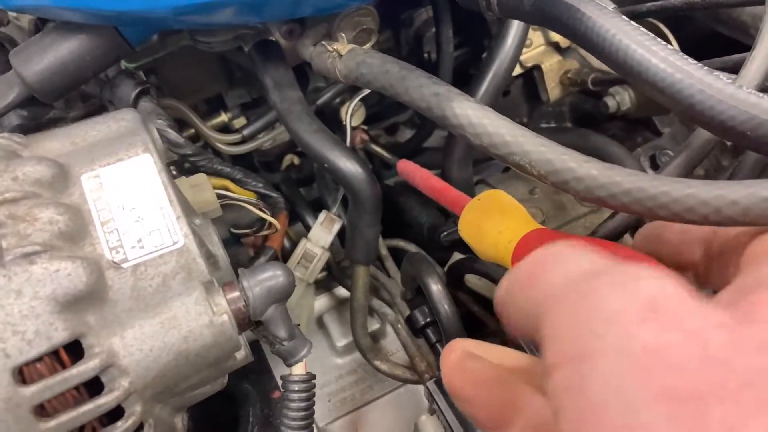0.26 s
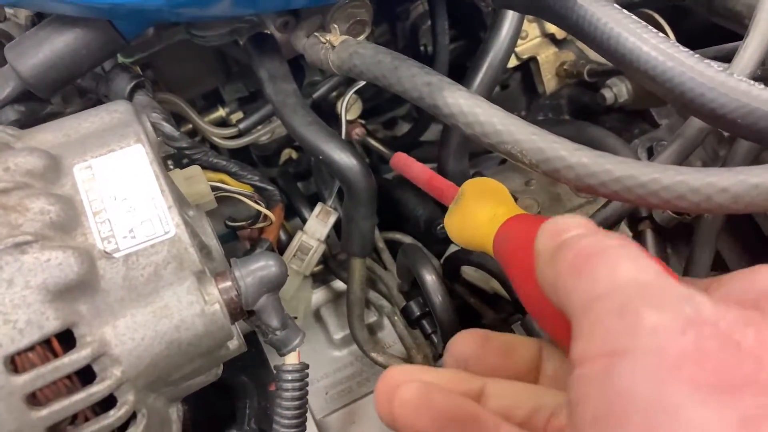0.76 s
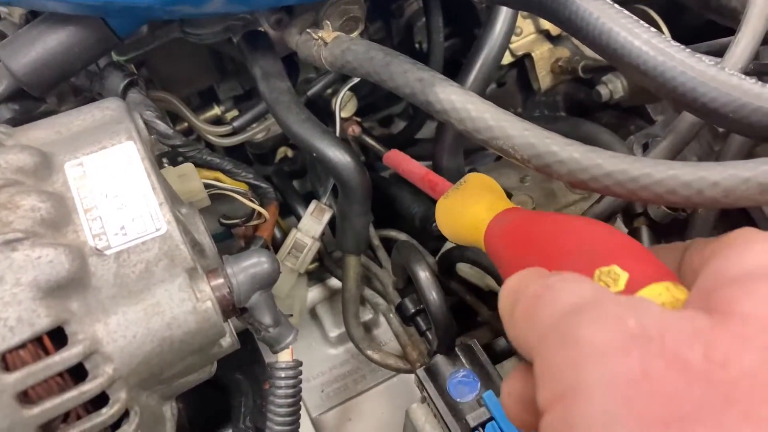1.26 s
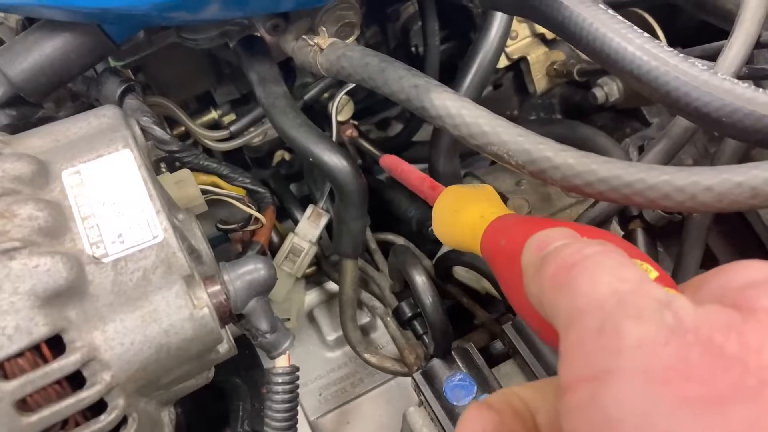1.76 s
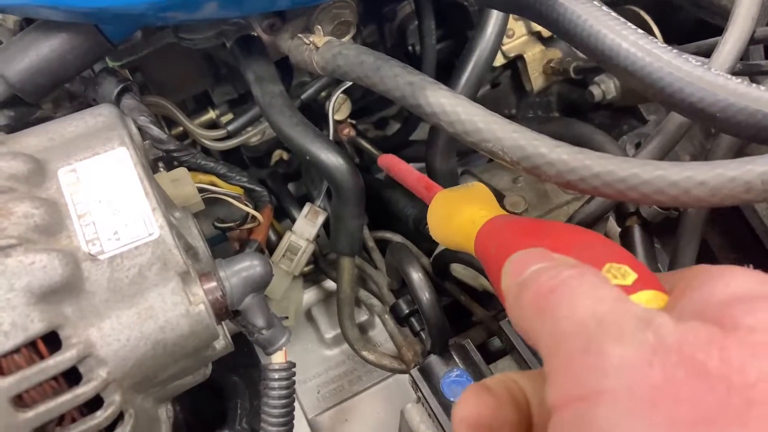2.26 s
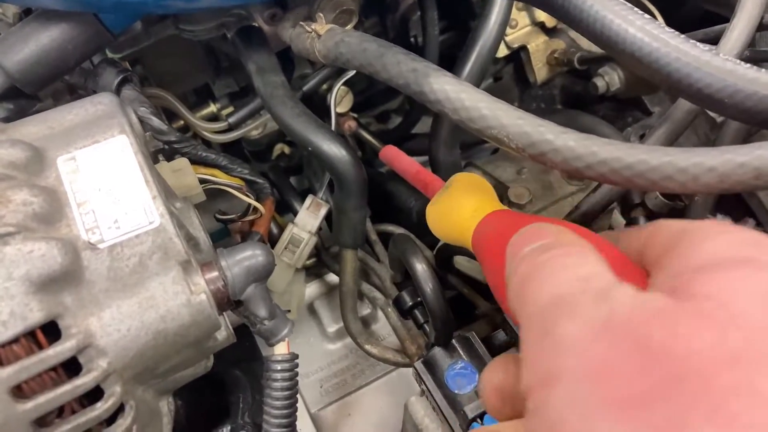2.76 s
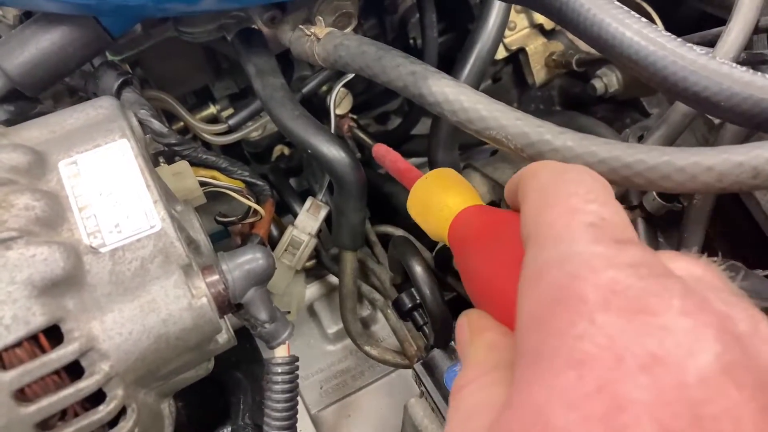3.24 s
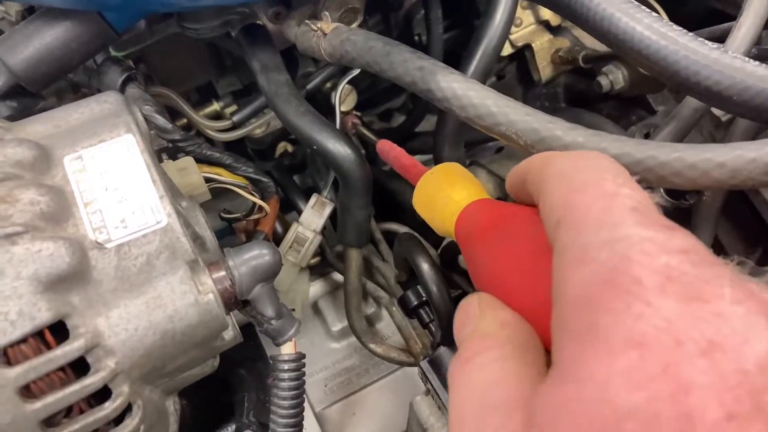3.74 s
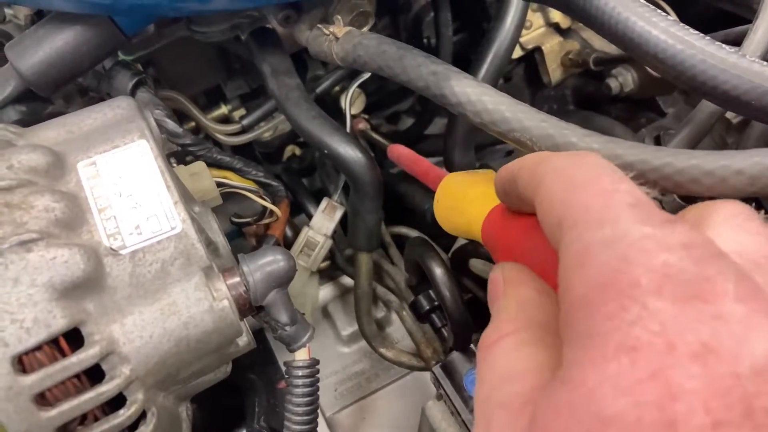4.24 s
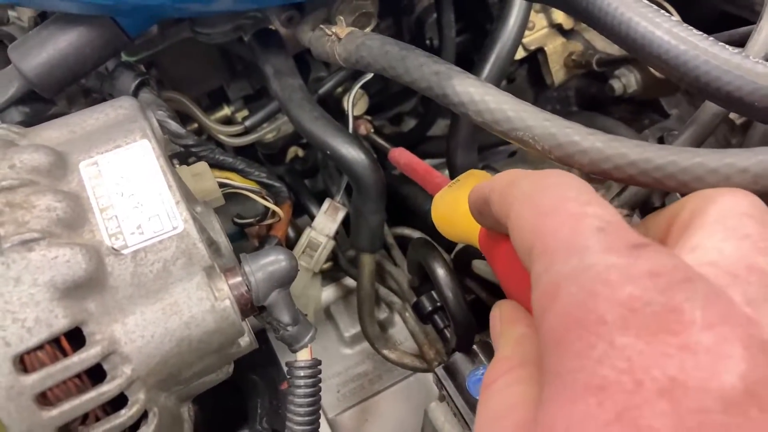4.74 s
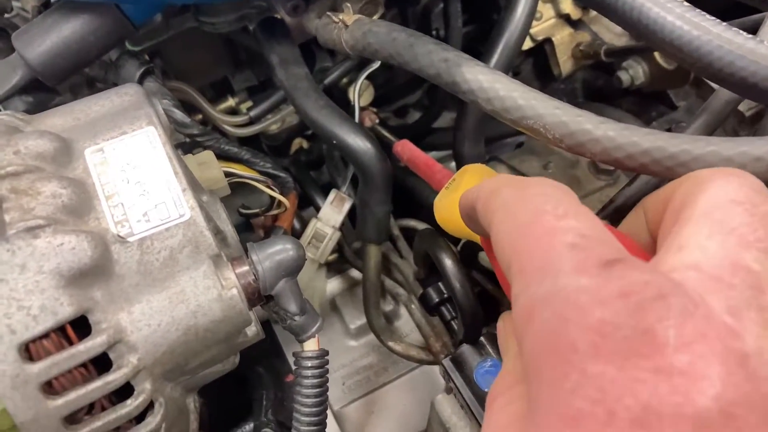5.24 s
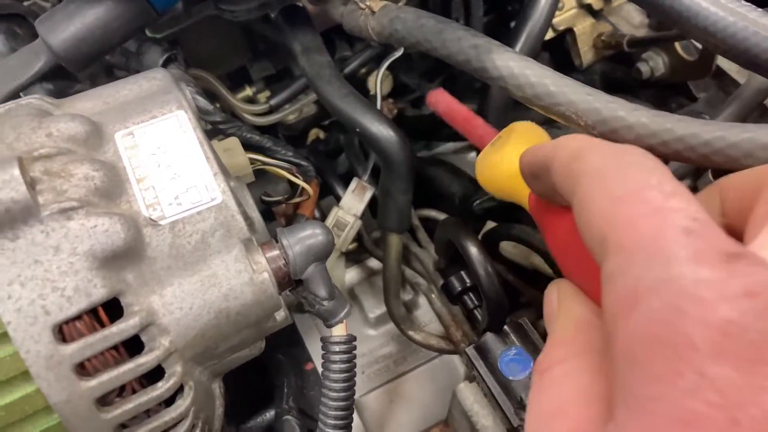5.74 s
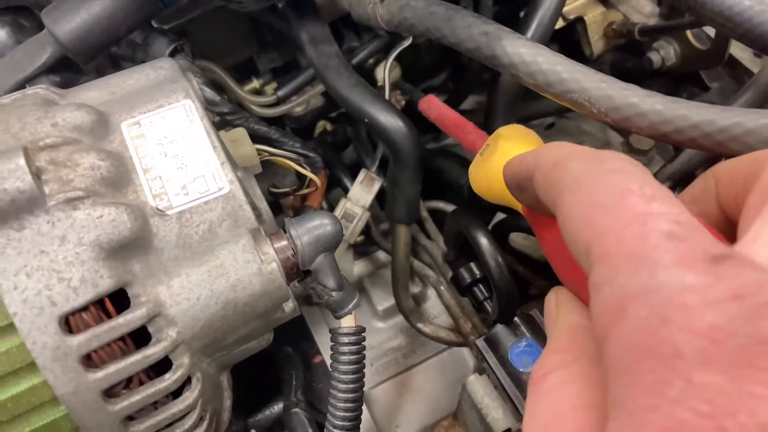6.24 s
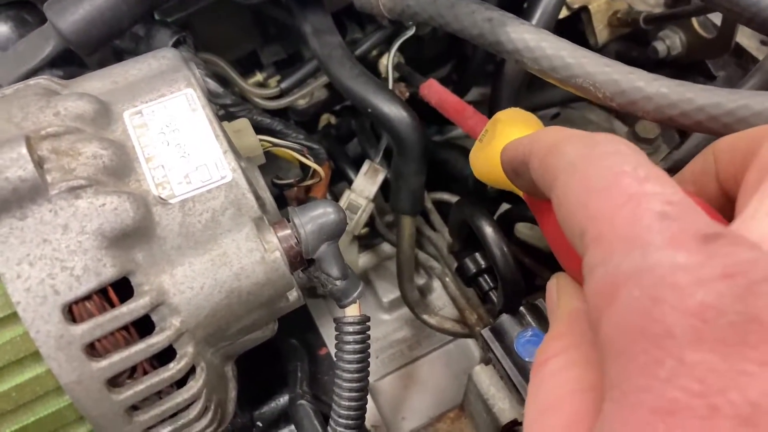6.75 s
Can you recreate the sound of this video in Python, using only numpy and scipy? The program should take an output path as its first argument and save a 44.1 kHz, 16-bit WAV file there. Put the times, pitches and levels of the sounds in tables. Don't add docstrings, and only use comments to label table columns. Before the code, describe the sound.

In an open engine bay, rapid deep exhaust pulses throb in clusters with airy hiss bursts, while belts, fan and pumps whirr continuously behind.

```python
import sys
import numpy as np
from scipy import signal
from scipy.io import wavfile
from scipy.ndimage import uniform_filter1d

SR = 44100
rng = np.random.default_rng(int(sys.argv[2]) if len(sys.argv) > 2 else 0)


def master(y):
    cut = np.clip(np.atleast_2d(y).T, -1, 1)
    pcm = np.round(cut * 32767)
    wavfile.write(sys.argv[1], SR, pcm.astype(np.int16))


def gain_from_db(level_db):
    decades = np.asarray(level_db, float) / 20
    return 10 ** decades


N = 308700


def evened(x):
    return x / np.sqrt(np.mean(x ** 2) + 1e-20)


def read(hz, at_hz, value):
    return np.interp(np.log(hz + 1), np.log(np.add(at_hz, 1)), value)


def noise_pair(level_db, same, lead, balance_db, patchy_db, size):
    a, b, c, d, patches = rng.standard_normal((4 * N // size + 5, size // 2 + 1, 5)).T
    patches = uniform_filter1d(patches, size=6, axis=0)
    patches = evened(uniform_filter1d(patches, size=6, axis=1))
    same = np.clip(same, 0, 1)[:, None]
    left = a + 1j * b
    right = same * left + np.sqrt(1 - same ** 2) * (c + 1j * d)
    right = right * (np.exp(-1j * lead) / gain_from_db(balance_db))[:, None]
    z = np.array([left, right]) * gain_from_db(level_db[:, None] + patchy_db * patches)
    return signal.istft(z, nperseg=size, noverlap=3 * size // 4)[1][:, :N]


def train(seconds, sizes):
    return np.bincount(np.round((seconds + 1) * SR).astype(int), sizes, N + 2 * SR)


# start_s, shaft_rpm
IDLE_SPEED = [
    (0, 1633.6),
    (1.22, 1671.7),
    (1.81, 1634.5),
    (2.58, 1657.3),
    (4.21, 1637.2),
    (5.25, 1658.4),
    (6.14, 1621.2),
    (7, 1625.2),
]
FRONT_RUNS = [
    (0, 0, 3, 1),
    (19, 0, 4, 1),
    (20, 1, 3, 1),
    (27, 1, 4, .8),
    (28, 2, 3, 1),
    (29, 2, 4, .8),
    (30, 3, 3, 1),
]
REAR_RUNS = [
    (0, 0, 3, 1),
    (5, 0, 4, .6),
    (7, 0, 4, .8),
    (8, 1, 3, 1),
    (30, 1, 4, .8),
    (32, 2, 3, 1),
]


def chambers():
    per_turn, per_lope = 2, 12
    t = np.arange(-.102, 7.01, 1 / SR)
    passed = np.cumsum(np.interp(t, *np.transpose(IDLE_SPEED))) / 60 * per_turn / SR
    k = np.arange(int(passed[-1]) + 1)
    times = np.interp(k, passed, t)
    rotor, lope = k % per_turn, k // per_lope
    place = k % per_lope // per_turn
    burnt, nth = np.zeros(len(k)), np.zeros(len(k), int)
    for which, runs in enumerate((FRONT_RUNS, REAR_RUNS)):
        for start, begin, count, last in runs:
            mine = (rotor == which) & (lope >= start)
            burnt[mine] = ((place >= begin) & (place < begin + count))[mine]
            burnt[mine & (place == begin + count - 1)] = last
            nth[mine] = np.clip(place - begin, 0, 3)[mine]
    return times, rotor, burnt, nth


# pitch_hz, level_db
WHIRR = [(25, -70), (60, -62), (110, -61), (200, -63), (250, -64), (300, -64), (430, -66.5), (600, -60),
         (750, -63), (1300, -61), (1900, -62.5), (2700, -67), (4200, -73), (6000, -75), (12000, -86)]
# pitch_hz, width_hz, level_db (rms)
PANELS = [(264, 34, -40), (385, 45, -42), (552, 18, -35.5), (628, 55, -30.5), (865, 80, -38),
          (957, 60, -41), (1250, 110, -37), (1515, 45, -41.5), (1720, 60, -45), (1848, 45, -41.5),
          (2320, 55, -43), (2930, 100, -45), (3475, 50, -49.5), (3943, 16, -49.5)]
# pitch_hz, likeness (0-1), left_lead_rad, left_minus_right_db
PORTS = [(60, .99, .2, 3), (260, .9, .2, 7), (380, .6, .1, 5), (450, .2, 1.5, 8), (600, .85, 3.3, 2.5),
         (850, .9, 3.6, 0), (1100, .6, 3.8, -1), (1250, .2, 3.5, -1), (1550, .55, 2.3, -2),
         (1900, .5, 2.1, -3), (2200, .1, 3, -1), (2700, .65, 3.3, 0), (3500, .15, 3, -2), (5000, .5, 3, 0)]


def whirr(times, rotor, burnt, nth):
    hz = np.fft.rfftfreq(4096, 1 / SR)
    at_hz, *columns = np.transpose(PORTS)
    broad = gain_from_db(2 * read(hz, *np.transpose(WHIRR)))
    humps = sum(gain_from_db(2 * db) / width / (1 + (2 * (hz - f) / width) ** 2) ** 2 for f, width, db in PANELS)
    level_db = 10 * np.log10(broad + humps)
    pair = noise_pair(level_db, *(read(hz, at_hz, c) for c in columns), patchy_db=2.5, size=4096)
    load = uniform_filter1d(train(times + .07, burnt - burnt.mean()), size=4000)
    load = evened(load[SR:SR + N])
    surge = np.cumsum(load - uniform_filter1d(load, size=SR // 2))
    pair = np.array([np.interp(np.arange(N) + .003 * surge, np.arange(N), port) for port in pair])
    level = np.sqrt(np.sum(broad + humps) * hz[1] / np.mean(pair[0] ** 2))
    return pair * gain_from_db(0.5 * load) * level


# pitch_hz, slope_level_db (dB per Hz)
HISS = [(2500, -21), (4000, -10), (5500, -5), (7500, -3), (9000, -1.5), (11500, -0.5), (13500, -3),
        (15500, -3.5), (17000, -37)]
# start_s, extra_power_db
SPITS = [
    (.136, -1),
    (.556, 1.5),
    (1.64, -1),
    (1.915, -8),
    (2.077, 4),
    (2.733, 4.5),
    (3.406, -15),
    (4.32, 3.5),
    (4.758, 1),
    (5.175, 0),
]
# delay_ms, gain
WALLS = [(.63, .1), (1.7, .12), (2.9, .14), (4.6, -.14), (7.3, .14), (11.2, .12)]


def leak(times, rotor, burnt, nth):
    luck = rng.standard_normal((len(times), 2))
    lit = burnt * gain_from_db(2 * (0.54 * luck[:, 0] + 2.2 * (nth == 0)))
    strength = lit + 0.057 * gain_from_db(2 * 1.4 * luck[:, 1])
    t = np.arange(SR // 5) / SR
    puff = (1 - np.exp(-t / 0.0085)) ** 2 * (np.exp(-t / 0.0087) + 0.13 * np.exp(-t / 0.012))
    spit_s, spit_db = np.transpose(SPITS)
    blows = train(times - .008, strength) + train(spit_s - .007, gain_from_db(2 * spit_db))
    power = abs(signal.oaconvolve(blows, puff)[SR:SR + N]) + 0.04
    flutter = gain_from_db(0.8 * evened(uniform_filter1d(rng.standard_normal(N), size=160)))
    hz = np.fft.rfftfreq(256, 1 / SR)
    lead = 2 * np.pi * hz * 162e-6 - 2.6
    level_db = read(hz, *np.transpose(HISS))
    same = read(hz, (5000, 9000), (.72, .84))
    hiss = noise_pair(level_db, same, lead, 0 * hz, patchy_db=1.7, size=256)
    direct = hiss * np.sqrt(power) * flutter
    echoes = sum(gain * np.roll(direct, round(ms * SR / 1000), axis=1) for ms, gain in WALLS)
    return gain_from_db(-24) * evened(direct + echoes)


def gurgle(times, burnt):
    per_s, pitch_hz, t60_s, level_db, lit_db = 150, 171, 0.032, -28, 5.5
    lit = uniform_filter1d(train(times + .03, burnt), size=1600)[SR:SR + N + 20] * 800
    knocks = rng.standard_normal(N + 20) * (rng.random(N + 20) < per_s / SR)
    knocks = knocks * gain_from_db(level_db + lit_db * lit)
    t = np.arange(SR // 10) / SR
    ring = gain_from_db(-60 * t / t60_s) * (1 - np.exp(-t / 0.00093)) * np.sin(2 * np.pi * pitch_hz * t)
    return signal.oaconvolve(knocks, ring)[:N + 20]


# pitch_hz, t60_s, front_firing_db, rear_firing_db, unlit_pumping_db
PIPE = [(30.5, .7, -40.5, -44.5, -46.5), (57.8, .7, -34.6, -41.7, -65), (67, .51, -32, -26.6, -31.3),
        (83.6, .26, -31.1, -30.3, -40), (112.2, .19, -23.5, -23.1, -36.9), (132.9, .55, -65, -65, -37.2),
        (155.2, .7, -65, -39.1, -33.1), (173.7, .7, -37.5, -36, -65), (189.5, .43, -65, -29.3, -31.9),
        (206, .7, -65, -65, -36), (254.5, .6, -65, -55, -65)]


def pipe_ring(column, lag_s, rise_s):
    t = np.arange(SR // 3) / SR - lag_s
    rise = np.exp(-.5 * (np.minimum(t, 0) / rise_s) ** 2)
    after = np.maximum(t, 0)
    return rise * sum(gain_from_db(m[column] - 60 * after / m[1]) * np.cos(2 * np.pi * m[0] * t) for m in PIPE)


# thump_1_db, thump_2_db, thump_3_db, thump_4_db
BUILD_DB = [(-1.2, -2, -1.1, .7), (-.8, .25, -.1, .6)]
# delay_1_ms, delay_2_ms,
# delay_3_ms, delay_4_ms
THUMP_DELAY_MS = [(-.15, .55, .05, .05), (.25, .35, -.65, -.75)]


def exhaust(times, rotor, burnt, nth):
    blow = burnt * gain_from_db(0.57 * rng.standard_normal(len(times)) + np.array(BUILD_DB)[rotor, nth])
    heard = times + np.array(THUMP_DELAY_MS)[rotor, nth] / 1000
    push = gain_from_db(-6 * rotor + 1.2 * rng.standard_normal(len(times)) - 30 * burnt)
    front_ring = pipe_ring(column=2, lag_s=.0322, rise_s=.016)
    rear_ring = pipe_ring(column=3, lag_s=.0321, rise_s=.0125)
    pump_ring = pipe_ring(column=4, lag_s=.0304, rise_s=.0143)
    front = signal.oaconvolve(train(heard, blow * (rotor == 0)), front_ring)
    rear = signal.oaconvolve(train(heard, blow * (rotor == 1)), rear_ring)
    pumping = signal.oaconvolve(train(times, push), pump_ring)
    early = np.roll(front + rear, -round(.0152 * SR))
    knock = 0.76 * np.diff(early, prepend=0) * SR / (2 * np.pi * 190)
    pipe = gain_from_db(0.67) * (pumping - front - rear + knock)[SR - 10:][:N + 20]
    left = pipe + gurgle(times, burnt)
    return np.array([left[10:N + 10], gain_from_db(-2.5) * left[:N]])


def scene():
    firing = chambers()
    return exhaust(*firing) + leak(*firing) + whirr(*firing)


# pitch_hz, margin_db
SPARED = [(2200, 16), (2600, 5), (3200, 5.5), (3600, 7), (4400, 4.2), (6200, 6.5), (13800, 5), (15800, -4)]
# which, low_hz, high_hz
SILENT_BANDS = [
    (0, 5160, 5600),
    (1, 8200, 8900),
    (0, 11300, 12100),
]


def thinned_stereo(x):
    window = signal.windows.kaiser_bessel_derived(2048, 4 * np.pi)
    frame = dict(window=window, nperseg=2048, noverlap=1024)
    pad = np.zeros((2, 704))
    hz, _, z = signal.stft(np.hstack([pad, [x[0] + x[1], x[0] - x[1]]]) / 2, SR, **frame)
    edges = np.r_[0, 96:160:8, 160:241:16, 264, 272:721:16, 732]
    band_db = 10 * np.log10(np.add.reduceat(abs(z) ** 2, edges, axis=1) + 1e-20)
    margin_db = read(hz[edges], *np.transpose(SPARED))[:, None]
    keep = band_db[::-1] - band_db < np.array([abs(margin_db), margin_db])
    keep[:, 0], keep[:, -1] = True, False
    for which, low_hz, high_hz in SILENT_BANDS:
        keep[which, (hz[edges] > low_hz) & (hz[edges] < high_hz)] = False
    z = z * np.repeat(keep, np.diff(np.append(edges, len(hz))), axis=1)
    total, difference = signal.istft(z, SR, **frame)[1][:, pad.shape[1]:][:, :N]
    return np.array([total + difference, total - difference])


def low_pass(x):
    return signal.sosfilt(signal.butter(12, 16950, fs=SR, output="sos"), x)


def record(dry):
    bass_cut = signal.butter(2, 22, "high", fs=SR, output="sos")
    mix = thinned_stereo(signal.sosfilt(bass_cut, dry))
    return low_pass(mix)


dry = scene()
out = record(dry)
master(out)
```